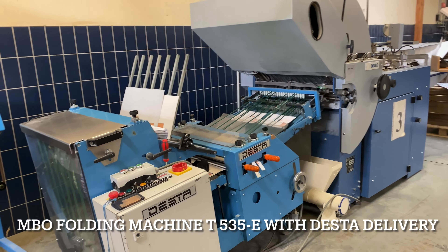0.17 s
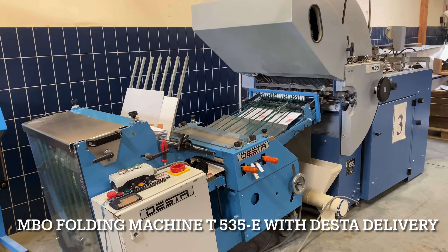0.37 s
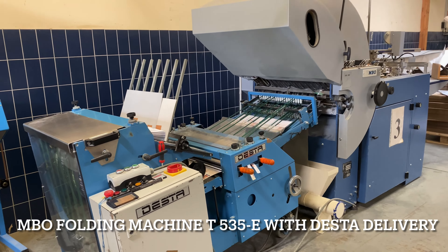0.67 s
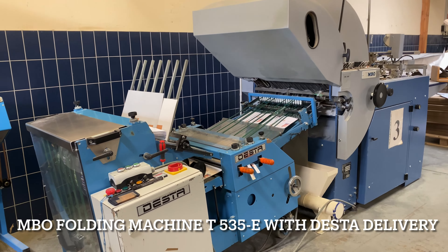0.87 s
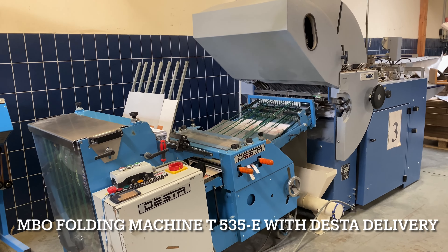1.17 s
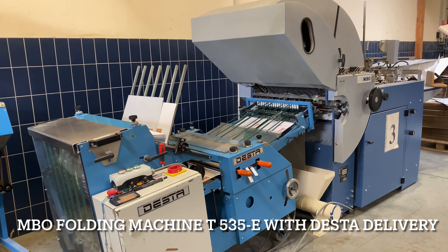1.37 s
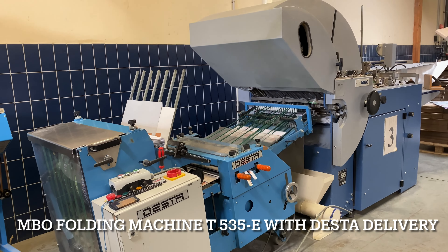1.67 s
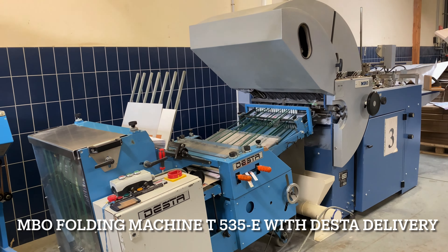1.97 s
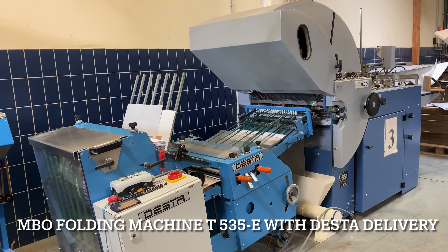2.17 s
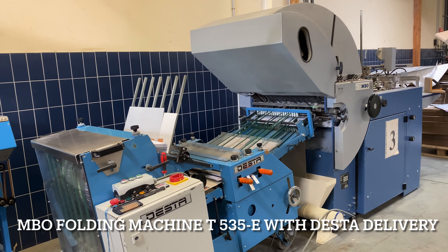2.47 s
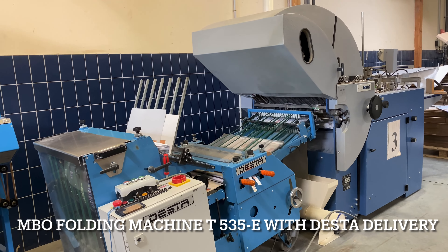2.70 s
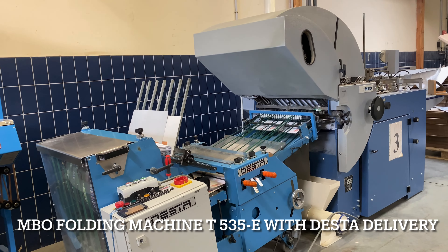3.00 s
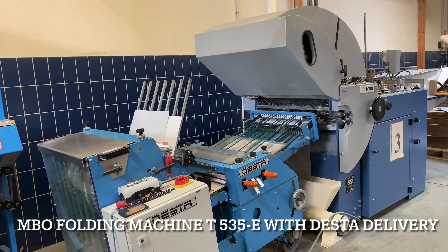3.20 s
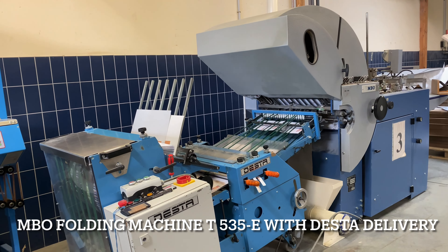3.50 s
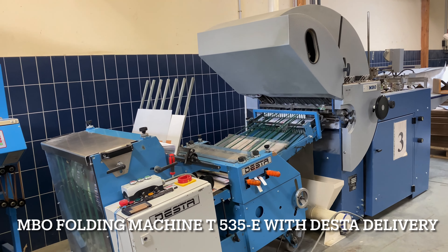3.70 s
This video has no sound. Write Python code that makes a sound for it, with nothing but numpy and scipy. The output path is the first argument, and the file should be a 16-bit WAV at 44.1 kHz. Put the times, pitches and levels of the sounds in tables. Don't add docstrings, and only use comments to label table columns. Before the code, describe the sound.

A paper folding machine runs steadily in a hard tiled workshop, each sheet giving two sharp steel clacks then a lighter slap, over roller whirr and motor rumble, heard close on a handheld phone drifting slightly away.

```python
import sys
import numpy as np
from scipy import signal
from scipy.fft import rfft, irfft, next_fast_len
from scipy.io import wavfile
from scipy.ndimage import uniform_filter1d, map_coordinates

SR = 44100
rng = np.random.default_rng(int(sys.argv[2]) if len(sys.argv) > 2 else 0)


def transcribe(u):
    v = np.clip(np.atleast_2d(u).T, -1, 1)
    q = np.round(v * 32767).astype(np.int16)
    wavfile.write(sys.argv[1], SR, q)


def voltage_ratio(level):
    return 10 ** (np.asarray(level, float) / 20)


N = 169785

# start_s, level_db
NEARNESS = [
    (0.0, -28.5),
    (0.52, -28),
    (1.7, -29.5),
    (2.14, -29),
    (3.85, -32.5),
]
# pitch_hz, level_db
WHIRR_TONE = [(300, 0.5), (650, -4), (1150, -5), (1270, -16), (1500, -7.5), (3000, -11.5), (5000, -11.5),
              (7300, -31.5), (10000, -42)]
# pitch_hz, width_hz, level_db
FRAME_RINGS = [(632, 90, -5), (822, 10, 1.5), (912, 9, -19.5), (1369, 16, 12.5), (1427, 19, 6),
               (1558, 27, 5), (1966, 200, -4), (3930, 18, 8.5)]
# pitch_hz, level_db
RATTLE_TONE = [(500, -9.5), (900, -4.5), (2000, -5), (4000, -3.5), (7000, -26)]
# pitch_hz, level_db
AIR_TONE = [(4000, -26), (6500, 2.5), (7400, -3.5), (8500, 1.5), (10000, 4.5), (12000, 0.5), (14000, -12),
            (16500, -18)]
# start_s, left_lead_rad
GEAR_LEAD = [(0, 1.2), (1.1, 1.5), (2, 2.5), (3.85, 2.5)]
# pitch_hz, level_db
RUMBLE_TONE = [(13, -42), (22, -19), (49, -3.5), (140, -2.5), (227, -1.5), (269, -8), (349, -2), (420, -14),
               (550, -13), (920, -120)]
# pitch_hz, likeness_share
RUMBLE_LIKENESS = [(30, .9), (200, .97), (300, .5), (400, .3)]
# pitch_hz, left_over_right_db
RUMBLE_BALANCE = [(30, 9), (70, -1), (150, 8), (350, 0.5)]

# start_s, level_db
FIRST_STOP_HITS = [(0.0655, -14.5), (0.3152, -17), (0.5621, -16.5), (0.809, -15.5), (1.0548, -17),
                   (1.3016, -16), (1.5479, -17), (1.7951, -16.5), (2.0417, -17), (2.2896, -16),
                   (2.5371, -16), (2.7841, -16.5), (3.0317, -20), (3.2787, -21.5), (3.5263, -18.5),
                   (3.7729, -18.5)]
SECOND_STOP_HITS = [(0.0872, -15.5), (0.3365, -13.5), (0.5835, -13.5), (0.8303, -15.5), (1.0764, -14.5),
                    (1.3229, -17.5), (1.5692, -18), (1.8165, -13.5), (2.0632, -15.5), (2.3109, -12),
                    (2.5585, -16.5), (2.8056, -14.5), (3.0531, -18), (3.3, -18), (3.5473, -17),
                    (3.7939, -17)]
GUIDE_HITS = [(0.2089, -23.5), (0.4556, -26), (0.7023, -23), (0.9484, -22.5), (1.1949, -23),
              (1.4411, -22.5), (1.6885, -25.5), (1.9354, -24), (2.1832, -24), (2.4306, -31.5),
              (2.6778, -25), (2.9251, -25), (3.1721, -24.5), (3.4193, -28), (3.666, -28)]
# rebound_db (added to the later contacts), brightness_db_per_octave
FIRST_STOP_LANDING = [(-1.5, .5), (-7.5, -1.5), (-6, .5), (-9, .5), (-2, 0), (5, 1), (4, 1), (-4.5, 0),
                      (-3, -1.5), (-5, -1), (-3, .5), (.5, 1.5), (-2.5, 3.5), (-3, 4), (-2.5, 1.5),
                      (-1, 2.5)]
SECOND_STOP_LANDING = [(2, -0.038), (-4, 0.32), (-6, -0.021), (-1, -0.61), (-3.5, 0.31), (-3, -0.2),
                       (4.5, 0.57), (-4, 0.84), (.5, 0.3), (-7.5, 0.87), (-1, 0.23), (-4, 0.36),
                       (0.5, 0.16), (-2, 0.24), (-3, 0.34), (-1, 0.66)]
GUIDE_SLAP_LANDING = [(1, 0.45), (4, .5), (-1, 0.099), (-3, 0.62), (-1, 0.33), (-1, -0.55), (2, -0.38),
                      (-1, -0.38), (6, 0.18), (2, .5), (3, 0.39), (0, 0.81), (-2, 0.42), (-2, 0.46),
                      (-3, .5)]
# delay_s, level_db, t60_s, brightness_db_per_octave
FIRST_STOP_CONTACTS = [
    (-.005, -16, .05, 0),
    (0, 0, .02, 2.5),
    (.0028, -4, .02, 0),
    (.0062, 0, .022, -1),
    (.009, -4, .1, .5),
]
SECOND_STOP_CONTACTS = [
    (-.002, -7, .02, 2),
    (0, 1, .02, 1.5),
    (.0025, -3, .028, -1),
    (.0062, -2, .03, -.5),
    (.0105, -4, .05, 0),
    (.013, -9, .15, .3),
    (.023, -18, .05, -6),
    (.031, -15, .08, -5),
]
GUIDE_SLAP_CONTACTS = [
    (-.004, -17, .05, 2),
    (0, 4, .008, .5),
    (.002, -2, .025, -1),
    (.008, -9, .22, -1.5),
    (.022, -16, .06, -3),
]
# pitch_hz, level_db
FIRST_STOP_TONE = [(400, -15.5), (900, -2), (2000, 0.5), (4000, 0), (6500, -10), (9000, -7), (13000, -17.5),
                   (16500, -35)]
SECOND_STOP_TONE = [(400, -15.5), (700, -7.5), (1500, -3), (3200, -3), (4800, -1), (7200, -15), (9000, -11),
                    (16000, -29.5)]
GUIDE_SLAP_TONE = [(400, -19), (900, -10), (1500, -2.5), (2300, 0), (3200, -12), (5000, -6), (7000, -13.5),
                   (10000, -14.5), (16000, -33)]
# pitch_hz, width_hz, level_db (over the colour)
FIRST_STOP_PLATE = [(920, 150, 5), (1431, 87, 9), (1790, 180, 5.5), (2502, 79, 13), (2990, 370, 3),
                    (3522, 50, 2), (4260, 55, 1.5)]
SECOND_STOP_PLATE = [(637, 40, 13.5), (1390, 30, -1.5), (1776, 180, 10.5), (2110, 270, 6.5),
                     (2820, 380, 6.5), (3630, 310, -7)]
GUIDE_SLAP_PLATE = [(1033, 110, 0.83), (1448, 53, 1.1), (1790, 76, 1.2), (2260, 300, 1.6)]
# start_s, peak_db, pitch_hz
STEEL_SNAPS = [(0.0734, -15, 1680), (0.092, -14, 1610), (0.3159, -14, 4130), (0.3225, -15, 4130),
               (0.3376, -12, 4500), (0.3438, -12, 4330), (0.4559, -21, 2090), (0.4678, -20, 1740),
               (0.5694, -15, 2370), (0.5892, -13, 1720), (0.5951, -14, 1740), (0.7025, -18, 2070),
               (0.8133, -16, 2200), (0.8389, -14, 1790), (0.8505, -16, 1960), (1.0621, -15, 2330),
               (1.0773, -15, 2300), (1.098, -15, 2170), (1.1951, -17, 2170), (1.3086, -13, 2350),
               (1.3322, -13, 1960), (1.6885, -22, 2240), (1.802, -15, 2280), (1.8173, -11, 4540),
               (1.9356, -19, 2300), (2.0422, -18, 1610), (2.0479, -16, 3060), (2.0633, -14, 2730),
               (2.08, -15, 2070), (2.1834, -19, 2150), (2.3123, -12, 2780), (2.3176, -12, 1870),
               (2.544, -14, 2370), (2.8067, -14, 1590), (3.8063, -16, 2020)]

# pitch_hz, t60_s
ROOM_DECAY = [(500, 0.37), (2000, 1), (5000, 0.77), (10000, 0.94)]
# pitch_hz, left_lead_rad
PORT_LEAD = [(400, -2.1), (1000, -1.25), (1600, -1.6), (3500, -3.14), (4300, -4.2), (5500, -3.6),
             (6500, -6.3), (7500, -9), (9000, -6.4), (9800, -7.3), (11700, -6.28)]
# pitch_hz, left_over_right_db
PORT_BALANCE = [(300, 5.5), (700, 0.5), (1450, -2), (2200, -0.5), (3500, -2), (5600, -2.5), (7000, 0.5),
                (8000, -1.5), (12000, -1)]
# pitch_hz, likeness_share
DIRECT_LIKENESS = [(400, 0.19), (1000, 0.85), (1700, 0.27), (3000, 0.67), (5500, 0.46), (8000, 0.6),
                   (11500, 0.91)]
DIFFUSE_LIKENESS = [(400, 0.18), (700, 1), (1000, 0.93), (1600, 0.05), (5500, 0.074), (8000, 0.4),
                    (11500, 0.75), (12000, 0.98)]
# start_s, edge_hz
LOW_CUT_EDGE = [
    (0, 490),
    (.5, 510),
    (.8, 700),
    (1.15, 560),
    (1.6, 510),
    (2.3, 520),
    (2.75, 600),
    (3.3, 620),
    (3.85, 590),
]

RISE_S = .0002


def unit(x):
    return x / np.sqrt(np.mean(x ** 2) + 1e-20)


def along(points, hz):
    f, v = np.transpose(points)
    return np.interp(np.log(hz + 1), np.log(f + 1), v)


def wobble(rate):
    knots = rng.standard_normal(int(N * rate / SR) + 4)
    return map_coordinates(knots, [np.arange(N) * rate / SR])


def filtered(x, response):
    m = next_fast_len(N + SR // 2)
    return irfft(rfft(x, m) * response(np.fft.rfftfreq(m, 1 / SR)), m)[..., :N]


def rings(f, peaks, extra_db=0):
    total = 1
    for (center, width, db), extra in zip(peaks, extra_db + np.zeros(len(peaks))):
        push = 1j * f * width
        total = total + voltage_ratio(db + extra) * push / (center * center - f * f + push)
    return total


def causal(gain):
    c = irfft(np.log(gain + 1e-6))
    c[1:len(c) // 2] *= 2
    c[len(c) // 2 + 1:] = 0
    return np.exp(rfft(c))


def ports(pair, alike, lead, left):
    def blend(hz):
        turn = np.arccos(np.clip(along(alike, hz), -1, 1)) / 2
        return np.array([np.cos(turn), np.sin(turn)])

    def skew(hz):
        half = voltage_ratio(along(left, hz) / 2) * np.exp(.5j * along(lead, hz))
        return np.array([half, 1 / half])

    mid, side = filtered(pair, blend)
    return filtered(np.array([mid + side, mid - side]), skew)


def rush(response, patchy_db):
    z = signal.stft(rng.standard_normal((2, N)), nperseg=512)[2]
    field = uniform_filter1d(rng.standard_normal(z.shape[1:]), 5, 0)
    field = uniform_filter1d(field, 8, 1)
    noise = signal.istft(z * voltage_ratio(patchy_db * unit(field)), nperseg=512)[1][:, :N]
    return unit(filtered(noise, response))


def nearness_db():
    return np.interp(np.arange(N) / SR, *np.transpose(NEARNESS))


def rattle():
    per_s, spread_db = 500, 3.5
    present = rng.random(N) < per_s / SR
    force = voltage_ratio(spread_db * rng.exponential(size=N))
    ticks = present * force * rng.standard_normal((2, N))
    return unit(filtered(ticks, lambda f: causal(voltage_ratio(along(RATTLE_TONE, f))) * rings(f, FRAME_RINGS)))


def rollers():
    whirr_db, rattle_db, air_db = -1, -14.5, -40
    whirr = rush(lambda f: voltage_ratio(along(WHIRR_TONE, f)) * rings(f, FRAME_RINGS), patchy_db=2)
    whirr = whirr + voltage_ratio(rattle_db) * rattle()
    air = rush(lambda f: voltage_ratio(along(AIR_TONE, f)), patchy_db=.5)
    whirr_gain = voltage_ratio(nearness_db() + whirr_db + 0.63 * wobble(23.37))
    air_gain = voltage_ratio(air_db + 0.27 * wobble(2.7))
    return whirr_gain * whirr + air_gain * air


def gear():
    mesh_hz, level_db, swing_db, peak_s, sheet_s = 1679, -11.5, 7, .02, .2471
    t = np.arange(N) / SR
    load_db = swing_db * np.cos(2 * np.pi * (t - peak_s) / sheet_s)
    db = nearness_db() + level_db + load_db + 2 * wobble(9) + 2.5 * wobble(35)
    phase = 2 * np.pi * np.cumsum(mesh_hz + 5 * wobble(20)) / SR
    half_lead = np.array([[.5], [-.5]]) * np.interp(t, *np.transpose(GEAR_LEAD))
    return voltage_ratio(db) * np.sin(phase + half_lead)


def rumble():
    level_db, fade_db_per_s, lead_rad = -20, -0.46, 1.5
    low = rush(lambda f: voltage_ratio(along(RUMBLE_TONE, f)), patchy_db=2.0)
    fade_db = fade_db_per_s * (np.arange(N) - N / 2) / SR
    pair = ports(low, RUMBLE_LIKENESS, [(100, lead_rad)], RUMBLE_BALANCE)
    return voltage_ratio(nearness_db() + level_db + fade_db) * pair


def blows(table, landing, contacts, tone, plate):
    level_db, spike_db, ring_scatter_db, pivot_hz = -2, 2.5, 2.5, 2600
    lead_in_s, rebound_s = .006, .004
    same = .35
    out, size = np.zeros((2, N + SR)), 8192
    t, f = np.arange(size) / SR - lead_in_s, np.fft.rfftfreq(size, 1 / SR)
    at, level, t60, tilt = np.transpose(contacts)[..., None]
    octaves = np.log2((f + 100) / pivot_hz)
    colours = np.array([causal(voltage_ratio(along(tone, f) + k * octaves)) for k in tilt])
    habit = rng.standard_normal((2, 1, size))
    for (s, db), (rebound_db, bright_db) in zip(table, landing):
        force_db = level + rebound_db * (at > rebound_s) + rng.normal(0, 0.7, level.shape)
        decay = voltage_ratio(force_db - 60 * np.abs(t - at) / t60)
        shape = decay * np.clip((t - at) / RISE_S, 0, 1) * (t < t[-1] / 2)
        spikes = np.repeat(voltage_ratio(spike_db * rng.standard_normal(size // 16)), 16)
        chatter = np.sqrt(same) * habit + np.sqrt(1 - same) * rng.standard_normal((2, 1, size))
        hit = np.sum(rfft(chatter * spikes * shape) * colours, axis=1)
        hit = hit * causal(voltage_ratio(bright_db * octaves))
        hit = irfft(hit * rings(f, plate, rng.normal(0, ring_scatter_db, len(plate))), size)
        body_rms = np.sqrt(np.mean(hit[:, 260:900] ** 2))
        start = round((s - lead_in_s) * SR)
        out[:, start:][:, :size] += voltage_ratio(db + level_db) * hit / body_rms
    return out[:, :N]


def folds():
    first = blows(FIRST_STOP_HITS, FIRST_STOP_LANDING, FIRST_STOP_CONTACTS, FIRST_STOP_TONE, FIRST_STOP_PLATE)
    second = blows(SECOND_STOP_HITS, SECOND_STOP_LANDING, SECOND_STOP_CONTACTS,
                   SECOND_STOP_TONE, SECOND_STOP_PLATE)
    guide = blows(GUIDE_HITS, GUIDE_SLAP_LANDING, GUIDE_SLAP_CONTACTS, GUIDE_SLAP_TONE, GUIDE_SLAP_PLATE)
    return first + second + guide


def snaps():
    t60_s, half_lead_rad, crack = .014, .8, .5
    out, t = np.zeros((2, N + SR)), np.arange(SR // 50) / SR
    lead = half_lead_rad * np.array([[1], [-1]])
    for s, db, hz in STEEL_SNAPS:
        ring = np.sin(2 * np.pi * hz * t + lead)
        knock = ring + crack * rng.standard_normal((2, len(t)))
        shape = voltage_ratio(db - 60 * t / t60_s) * np.minimum(t / RISE_S, 1)
        out[:, round(s * SR):][:, :len(t)] += shape * knock
    return filtered(out[:, :N], lambda f: causal(1 / (1 + (f / 6000) ** 4) / (1 + (1000 / (f + 1)) ** 4)))


def walls(pair):
    gap_s = .012
    hz, t, z = signal.stft(rng.standard_normal((2, SR)), SR, nperseg=256)
    decay = voltage_ratio(-60 * t / along(ROOM_DECAY, hz)[:, None])
    tail = signal.istft(z * decay, SR, nperseg=256)[1]
    late = np.pad(pair, ((0, 0), (round(gap_s * SR), 0)))
    return signal.fftconvolve(late, tail / np.linalg.norm(tail[0]), axes=1)[:, :N]


def low_cut(x):
    cut_db, width_hz, floor_hz = -12, 30, 360
    hz, t, z = signal.stft(x, SR, nperseg=2048)
    hz = hz[:, None]
    edge = np.interp(t, *np.transpose(LOW_CUT_EDGE))
    shelf = voltage_ratio(cut_db / (1 + np.exp(np.clip((hz - edge) / width_hz, -30, 30))))
    floor = 1 + (floor_hz / (hz + 1)) ** 6
    return signal.istft(z * shelf / floor, SR, nperseg=2048)[1][:, :N]


def scene():
    room_db = -7.5
    hits = folds()
    direct = ports(hits, DIRECT_LIKENESS, PORT_LEAD, PORT_BALANCE) + snaps()
    around = voltage_ratio(room_db) * walls(hits) + rollers()
    diffuse = ports(around, DIFFUSE_LIKENESS, PORT_LEAD, PORT_BALANCE)
    return low_cut(direct + diffuse) + gear() + rumble()


def low_pass(x):
    return signal.sosfilt(signal.butter(12, 16500, fs=SR, output="sos"), x)


def record(dry):
    ceiling, top_hz = 1.05, 16300
    held = dry / (1 + np.abs(dry / ceiling) ** 4) ** (1 / 4)
    mix = filtered(held, lambda hz: 1 / (1 + (hz / top_hz) ** 36.0))
    return low_pass(mix)


dry = scene()
out = record(dry)
transcribe(out)
```